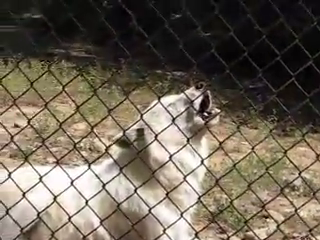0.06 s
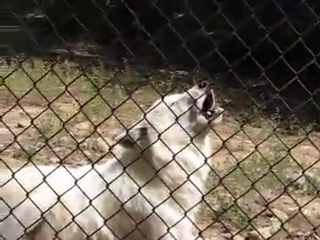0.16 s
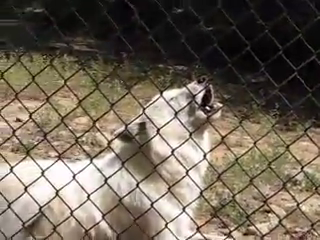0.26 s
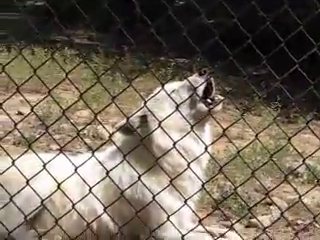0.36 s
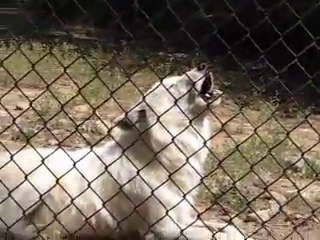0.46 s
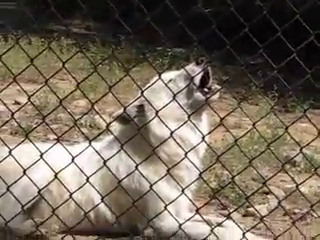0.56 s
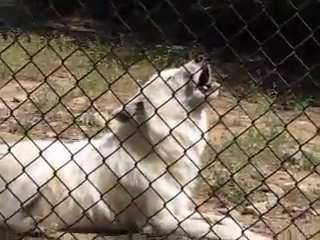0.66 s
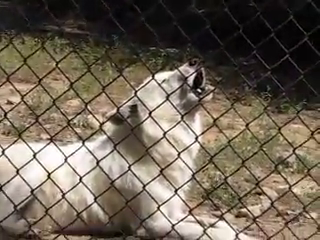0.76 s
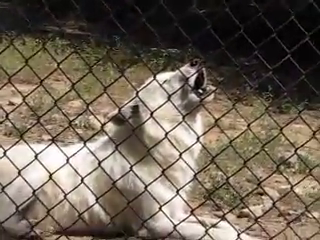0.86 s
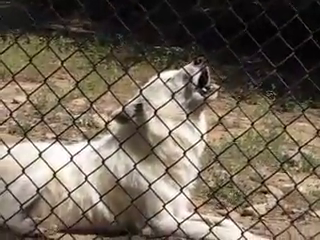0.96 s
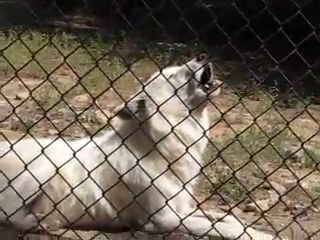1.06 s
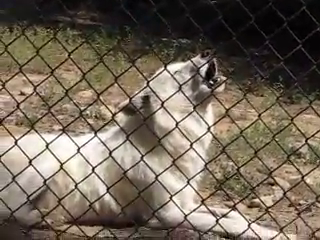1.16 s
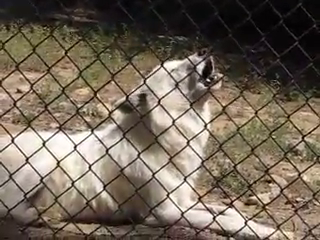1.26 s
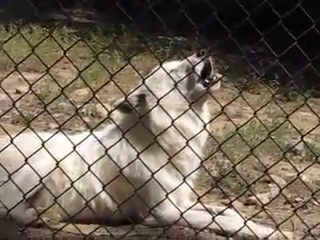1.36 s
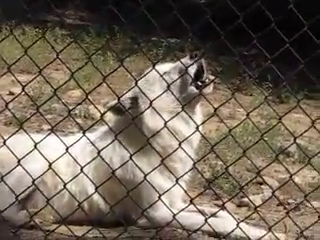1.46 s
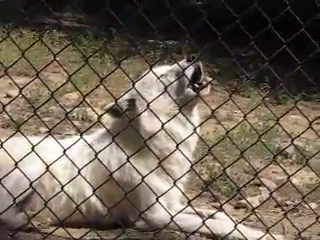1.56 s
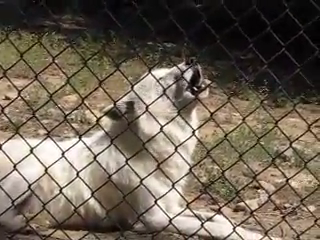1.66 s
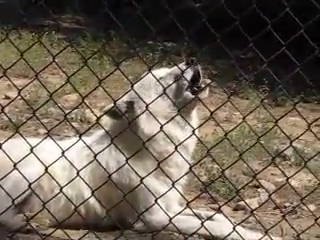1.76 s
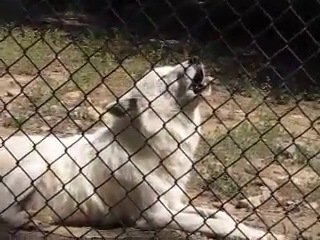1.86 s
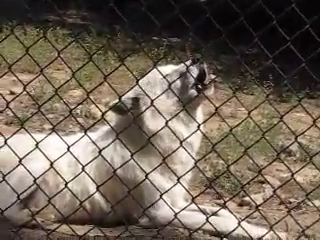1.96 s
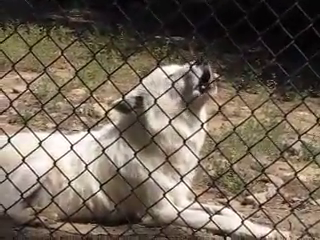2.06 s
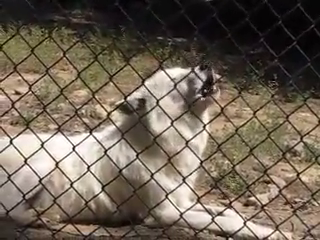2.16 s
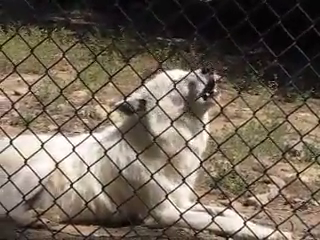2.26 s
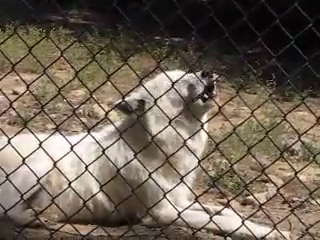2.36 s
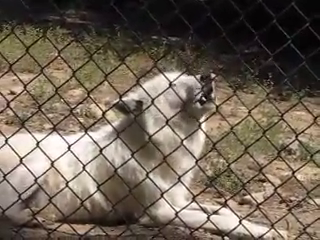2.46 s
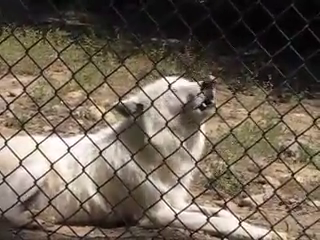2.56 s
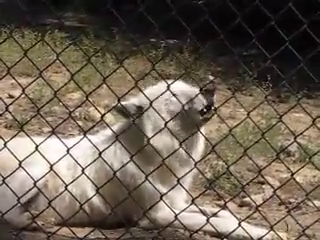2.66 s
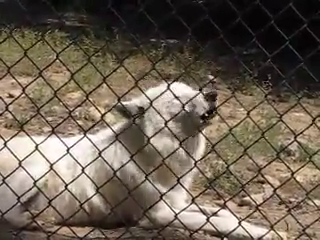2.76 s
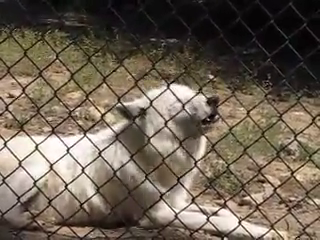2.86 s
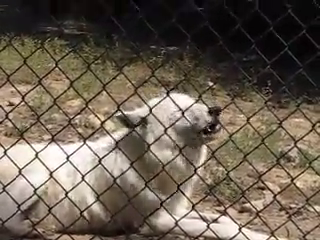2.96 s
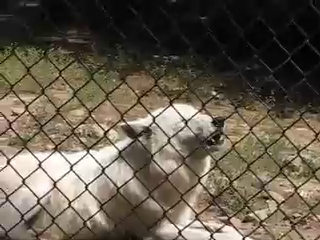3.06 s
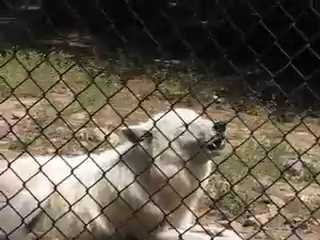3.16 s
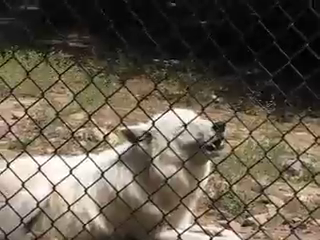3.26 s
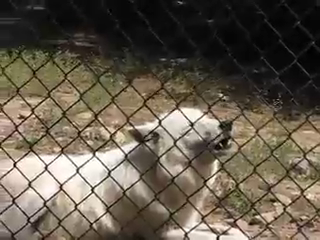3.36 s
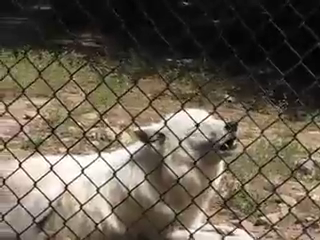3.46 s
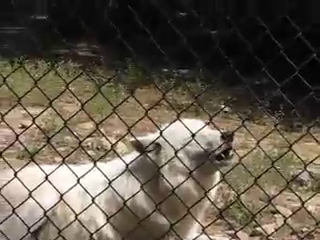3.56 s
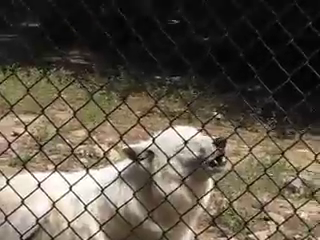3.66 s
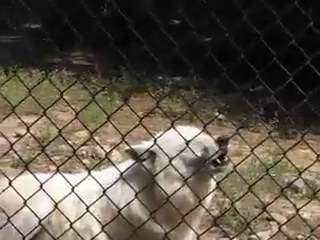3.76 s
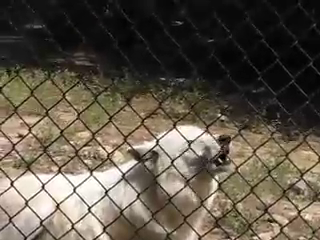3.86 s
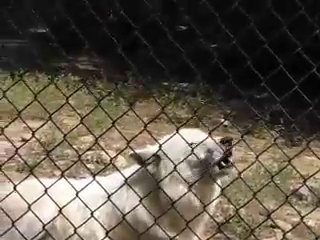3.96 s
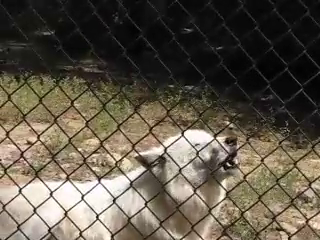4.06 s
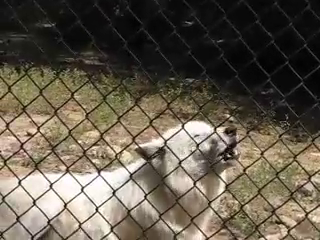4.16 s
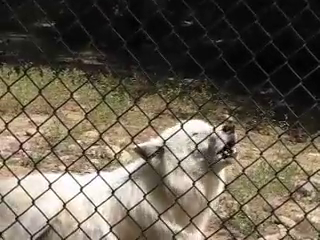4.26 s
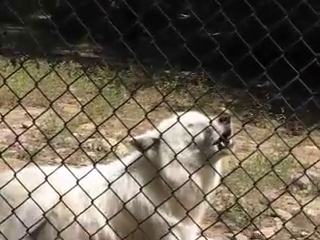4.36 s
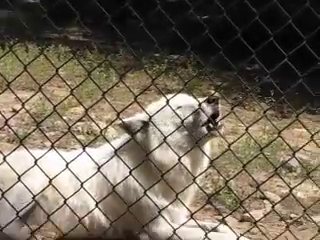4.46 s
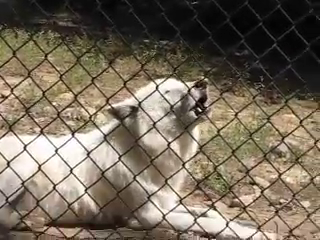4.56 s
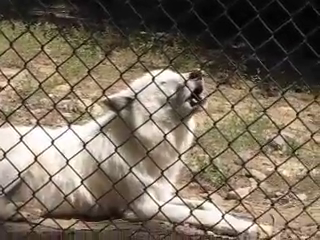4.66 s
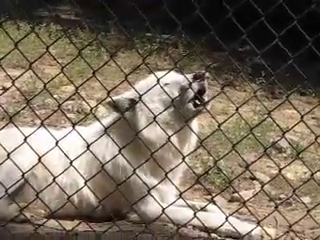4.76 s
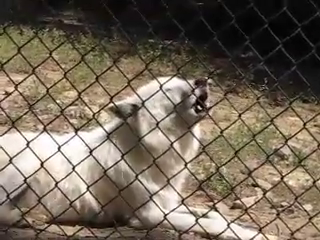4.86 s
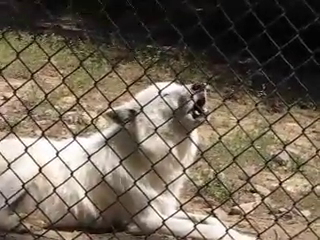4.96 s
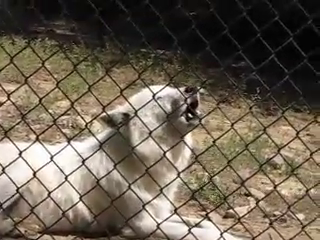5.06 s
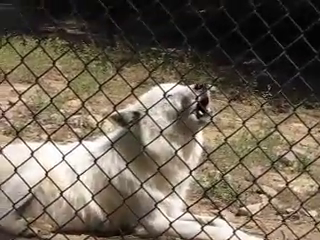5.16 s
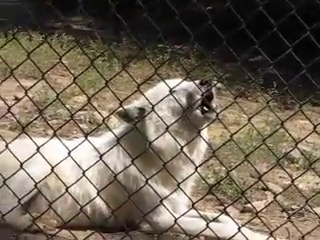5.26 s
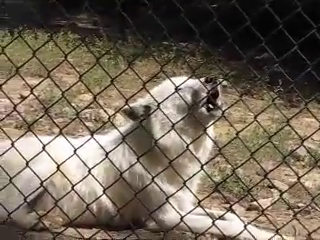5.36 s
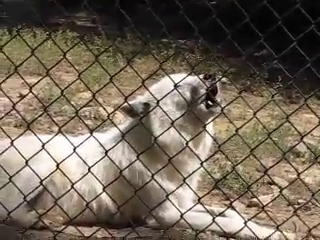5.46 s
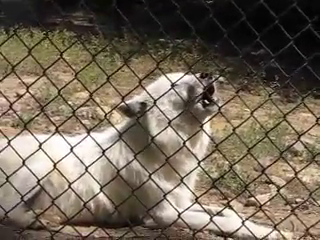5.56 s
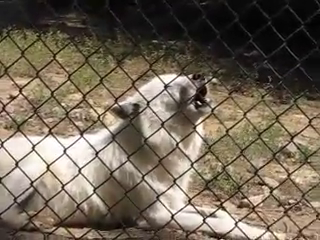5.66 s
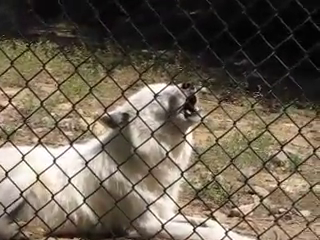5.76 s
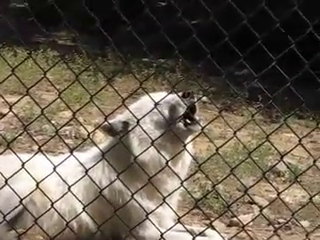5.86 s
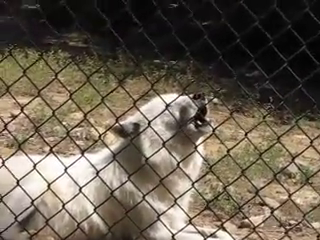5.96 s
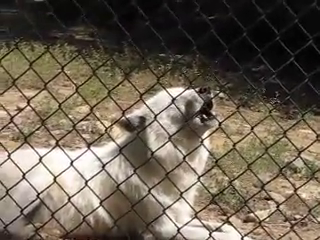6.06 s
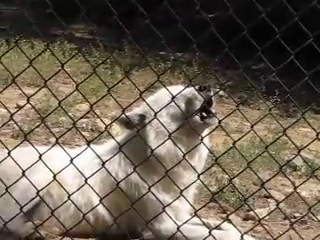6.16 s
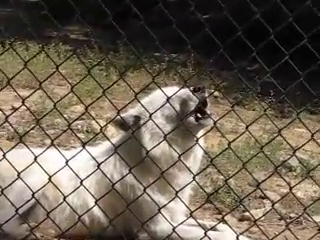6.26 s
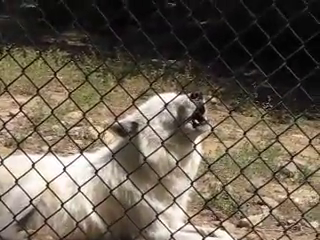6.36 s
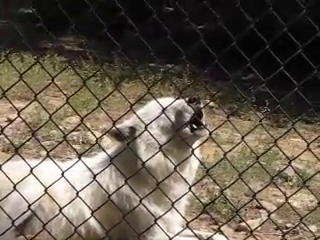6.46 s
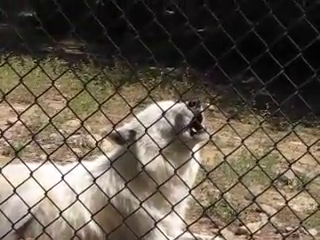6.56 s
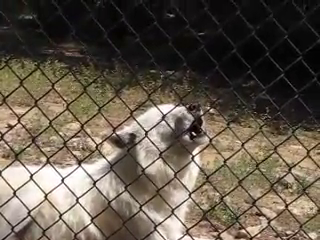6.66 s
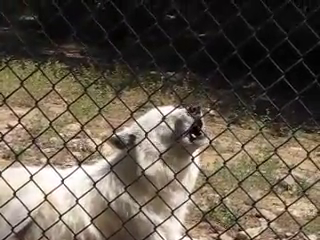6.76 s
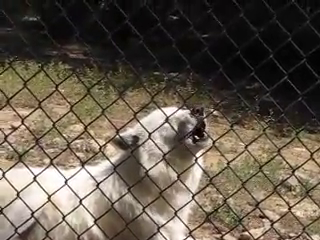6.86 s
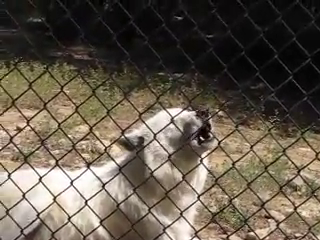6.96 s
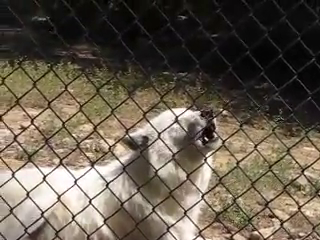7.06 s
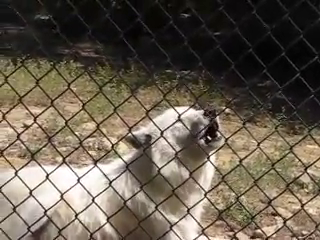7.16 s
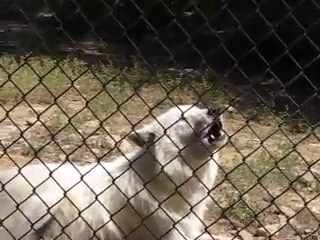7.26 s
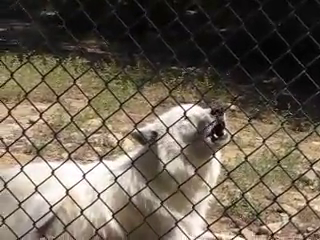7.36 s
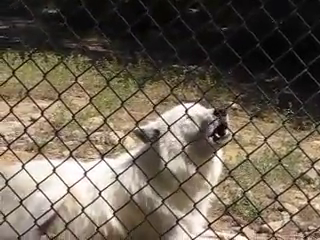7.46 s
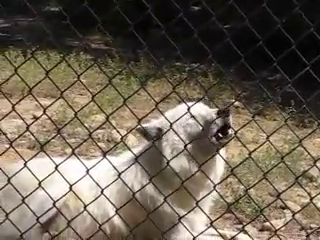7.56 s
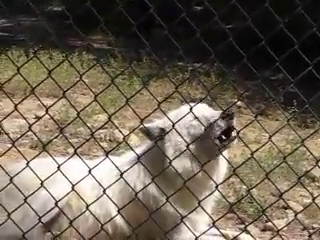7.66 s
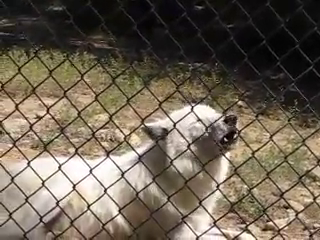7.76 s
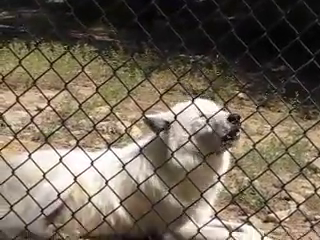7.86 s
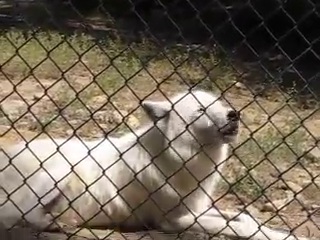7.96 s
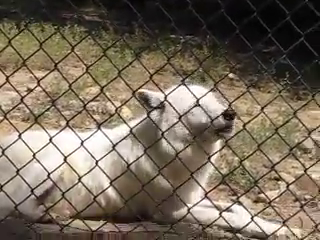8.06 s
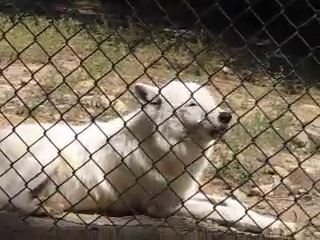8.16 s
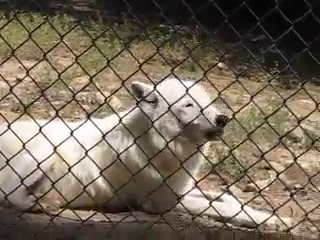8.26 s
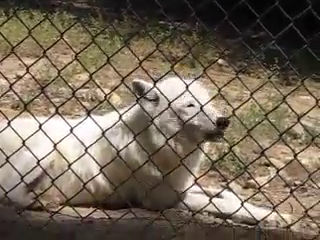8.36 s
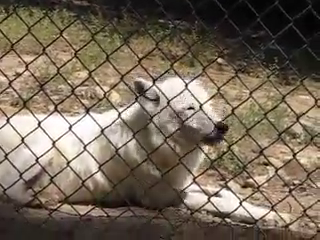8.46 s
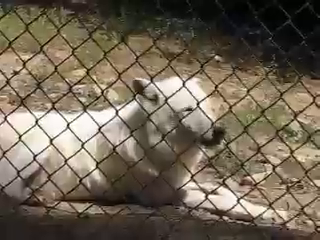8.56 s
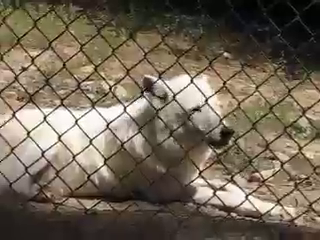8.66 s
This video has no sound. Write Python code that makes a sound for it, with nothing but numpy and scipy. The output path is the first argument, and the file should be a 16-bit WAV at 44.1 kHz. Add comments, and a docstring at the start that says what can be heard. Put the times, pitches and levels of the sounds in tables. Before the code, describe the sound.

Two long howls from a nearby wolf, with other wolves droning and answering from farther off, ending in a low rising moan.

```python
"""In a fenced enclosure among trees, a wolf lying close by howls twice, breaking downward, then starting hoarse.
Its voice is a few strong tones, thin overtones shaped by the throat, pulsing breath noise and a growl.
Pack mates hold long notes that beat together; others answer from farther off, as simpler sums of tones.
Shaped noise makes ticks in dry litter, soft hisses (breath puffs and rustles), dull thuds and the quiet air.
A faint echo comes back from the trees."""
import sys
import numpy as np
from scipy import signal
from scipy.fft import rfft, irfft, next_fast_len
from scipy.io import wavfile
from scipy.ndimage import uniform_filter1d, map_coordinates

SR = 44100
rng = np.random.default_rng(int(sys.argv[2]) if len(sys.argv) > 2 else 0)


def transcribe(signal):
    """Save signal, clipped to [-1, 1], as a 16-bit WAV file at the path in sys.argv[1]."""
    frames = np.atleast_2d(signal).T
    limited = np.clip(frames, -1, 1)
    pcm = np.round(limited * 32767).astype(np.int16)
    wavfile.write(sys.argv[1], SR, pcm)


N = 384880
TIME = np.arange(N) / SR


def amp(db):
    """Turn decibels into a plain multiplier."""
    return 10 ** (np.asarray(db) / 20)


def unit(x):
    """Scale a sound to an average strength (rms) of 1."""
    return x / np.sqrt(np.mean(x ** 2) + 1e-20)


def along(points, hz):
    """Read (pitch_hz, value) points on a log pitch axis, as hearing spaces pitch."""
    point_hz, values = np.transpose(points)
    return np.interp(np.log(hz + 1), np.log(point_hz + 1), values)


def curves(rows):
    """One value per sample for each column after the time."""
    start_s, *columns = np.transpose(rows)
    return [np.interp(TIME, start_s, column) for column in columns]


def gate(start_s, end_s, fade_s=0.083):
    """Open from start to end, with soft edges outside them."""
    nearest_edge = np.minimum(TIME - start_s, end_s - TIME)
    return np.clip(nearest_edge / fade_s + 1, 0, 1) ** 2


def swell(start_s, length_s):
    """One rounded rise and fall."""
    return np.sin(np.pi * np.clip((TIME - start_s) / length_s, 0, 1))


def wobble(rate):
    """A smooth random curve, rate knots a second."""
    knots = rng.standard_normal(int(N * rate / SR) + 4)
    return map_coordinates(knots, [TIME * rate])


def drift_db(live, depth_db, rate):
    """A random swing of level over the live samples, rate knots a second joined by straight lines."""
    knots = rng.standard_normal(int(TIME[-1] * rate) + 2)
    return depth_db * np.interp(TIME[live] * rate, np.arange(len(knots)), knots)


def bell(hz, centre_hz, width_hz):
    """The shape of one resonance, 1 at its centre."""
    return np.exp(-((hz - centre_hz) / width_hz) ** 2)


def filtered(x, gain):
    """Make each frequency in x louder or softer by gain(hz)."""
    size = next_fast_len(N + SR // 2)
    spectrum = rfft(x, size) * gain(np.fft.rfftfreq(size, 1 / SR))
    return irfft(spectrum, size)[..., :N]


def noise(colour):
    """Coloured noise of rms 1."""
    return unit(filtered(rng.standard_normal(N), lambda hz: amp(along(colour, hz))))


def partial(phase):
    """One pure tone, a sine of rms 1."""
    return np.sqrt(2) * np.sin(phase)


STEER_S = .04  # time in which a stray voice settles back on its note


def fold_phase(pitch, drift, jitter):
    """Vocal folds wander slowly and tremble quickly about the note, and keep settling back on it."""
    push = pitch * (drift * wobble(22) + jitter * wobble(260))
    stray = signal.lfilter([1], [1, -np.exp(-1 / (STEER_S * SR))], push)
    return 2 * np.pi * (np.cumsum(pitch) + stray) / SR


# pitch of the near wolf's two howls: start_s, pitch_hz
FIRST_PITCH = [(.01, 592.1), (.23, 579.7), (.4, 560.5), (.58, 549.7), (.94, 517.7), (1.16, 499.3),
               (1.23, 468), (1.263, 449), (1.273, 409), (1.3, 404.3), (1.7, 395.5), (2.1, 386.8),
               (2.135, 365.8), (2.16, 342.1), (2.21, 304.9), (2.29, 295.5), (2.38, 282.3)]
SECOND_PITCH = [(3.75, 274.3), (3.82, 282), (3.87, 303), (3.925, 322.7), (3.96, 380.6), (4.08, 398),
                (4.19, 407), (4.39, 413.1), (4.91, 414.1), (5.29, 420.9), (6.5, 401.2), (6.76, 392.9),
                (6.9, 384.9), (7.05, 377.4), (7.33, 371.8), (7.36, 362), (7.42, 308.6), (7.7, 273.7),
                (7.75, 266.7), (7.87, 224), (7.95, 206)]
# level of their lowest tone, before rasp and fades: start_s, level_db
FIRST_LEVEL = [(0, -12.5), (.6, -19), (.82, -28), (1, -24), (1.14, -30), (1.21, -19.5), (1.449, -19),
               (1.8, -16.5), (2.14, -20.5), (2.3, -32), (2.38, -35)]
SECOND_LEVEL = [(3.75, -40.5), (3.86, -22), (3.95, -15.5), (3.985, -17), (4.081, -10.5), (4.15, -16.5),
                (4.22, -11.5), (4.95, -13), (5.1, -15), (5.22, -12.5), (5.602, -15), (5.85, -12),
                (6.221, -16.5), (6.52, -16.5), (6.78, -12.5), (6.999, -20), (7.39, -19), (7.74, -42.5),
                (7.86, -30)]


def near_wolf():
    """Two howls from one throat, differing in brightness, breath and steadiness of the folds."""
    first = near_howl(FIRST_PITCH, FIRST_LEVEL, strong_db=-5.5, overtone_db=-50.5, breath_db=-48.5,
                      jitter=0.0024, low_register_db=-5.5, mouth_db=19, jaw_loss_db=9,
                      overtone_slack_db=1.5, crack_db=-7.5, bloom_db=2.5, strong_bloom_db=1)
    second = near_howl(SECOND_PITCH, SECOND_LEVEL, strong_db=-0.5, overtone_db=-50.0, breath_db=-51.5,
                       jitter=0.0012, low_register_db=-0.5, mouth_db=18.0, jaw_loss_db=16.5)
    return first + second


BREAK_HZ, BREAK_WIDTH_HZ = 425, 14  # the voice changes register here
FULL_DB = -13.5  # the lowest tone in full voice
RELEASE_S = 0.097  # a howl dies away over this time
BLOOM_S = .35  # the overtones of a fresh howl settle over this time
# colour of the air rushing through the open mouth: pitch_hz, relative level_db (per Hz)
BREATH = [(300, -1), (1240, 7.5), (1820, -5), (2680, 4), (3320, -13), (5000, -2.5), (5750, -17.5),
          (6620, 3), (8250, -19.5), (15000, -26.5)]


def near_howl(pitches, levels, strong_db, overtone_db, breath_db, jitter, low_register_db, mouth_db,
              jaw_loss_db, follow=0.35, bright_follow=0.41, crack_db=-9, bloom_db=-13, strong_bloom_db=-6,
              twelfth_slack_db=-58, overtone_slack_db=-6, patchy_db=16, taut_hz=400, slack_db=-25):
    """Pitch and level drive three strong tones, a ladder of thin overtones, and air pulsing with the folds."""
    (pitch,), (level_db,) = curves(pitches), curves(levels)
    start_s, end_s = pitches[0][0], pitches[-1][0]
    sounding = gate(start_s, end_s) * np.clip((end_s - TIME) / RELEASE_S, 0, 1)
    young = np.clip(1 - (TIME - start_s - GROWL_LENGTH_S) / BLOOM_S, 0, 1)
    crack, slack, rough = strain(pitch)
    high = np.clip((pitch - BREAK_HZ) / BREAK_WIDTH_HZ + .5, 0, 1)
    # everything above the lowest tone takes a share of its swells
    effort_db = level_db - FULL_DB
    bright_db = bright_follow * effort_db + low_register_db * (1 - high)
    phase = fold_phase(pitch, drift=0.0014, jitter=jitter * (1 + 10 * rough))
    # hoarse folds alternate strong and weak cycles and flutter irregularly
    rasp = rough * (0.42 * np.sin(phase / 2) + 1.1 * wobble(240))
    flutter = 1 + .012 * wobble(170)
    voice = amp(level_db) * partial(phase) * (1 + .3 * rasp)

    octave = amp(strong_bloom_db * young) * strong_partial(2, pitch, phase, high)
    twelfth = amp(twelfth_slack_db * slack) * strong_partial(3, pitch, phase, high)
    upper = (octave + twelfth) * amp(strong_db + follow * effort_db)

    # slack, cracking or freshly started folds change the highest overtones most
    dull_db = slack_db * np.clip(1 - pitch / taut_hz, -.08, 1) + bloom_db * young
    treble_db = dull_db + crack_db * crack
    # the middle resonance weakens as the breath runs out
    jaw_db = JAW_DB - jaw_loss_db * ((TIME - start_s) / (end_s - start_s)) ** 2
    ladder = throat_ladder(sounding > 0, pitch, phase, slack, treble_db, mouth_db, jaw_db, patchy_db)
    growl_swell = swell(GROWL_START_S, GROWL_LENGTH_S)
    ladder_db = bright_db + overtone_db + overtone_slack_db * slack * (2 - growl_swell)
    upper = upper + amp(ladder_db) * ladder

    breath_level = amp(bright_db + breath_db + np.minimum(dull_db, 0))
    breath = breath_level * noise(BREATH) * (1 + .5 * np.cos(phase))
    return sounding * ((voice + upper * (1 + rasp)) * flutter + breath + growl(phase))


# peaks that the 2nd and 3rd tones glide through, below and above the break: pitch_hz, relative level_db
LOW_REGISTER = [(450, -43.5), (560, -25.5), (615, -37.5), (680, -26.5), (735, -15.5), (762, -15),
                (785, -25), (802, -34.5), (827, -27.5), (880, -34), (1095, -48), (1150, -26.5), (1180, -16),
                (1260, -17)]
HIGH_REGISTER = [(900, -28.5), (1000, -23), (1120, -5.5), (1190, -9.5), (1450, -30), (1700, -44.5)]


def strong_partial(k, pitch, phase, high):
    """The kth tone swells and fades as the pitch carries it through the peaks of its register."""
    hz = k * pitch
    register_db = high * along(HIGH_REGISTER, hz) + (1 - high) * along(LOW_REGISTER, hz)
    # the throat spreads the phases of the tones, so the wave stays round
    return amp(register_db) * partial(k * phase + k * k)


MOUTH_HZ, MOUTH_WIDTH_HZ = 1205, 92  # the open mouth lifts whichever overtone glides through here
SHUT_START_S, SHUT_LENGTH_S, SHUT_SHARE = 7.47, 0.17, 0.85  # closing mouth; share of its resonance lost
JAW_DB, JAW_WIDTH_HZ = 13, 315  # starting height and width of the middle resonance
NASAL_DB, NASAL_WIDTH_HZ = -13.5, 230  # depth and width of the nasal notch
SWAY_DB_PER_KHZ = .75
# fixed overtone colour of the throat: pitch_hz, relative level_db
THROAT = [(1000, -2), (1400, 11.5), (1660, 3), (2060, -4.5), (2470, -5), (2800, -4.5), (3300, -20.5),
          (3720, -14), (4160, -20), (4550, -16.5), (5000, -13), (5500, -26), (6200, -11.5), (6600, -4),
          (7250, -22.5), (8300, -31.5), (12000, -33.5)]
# two high throat resonances, open early in the first howl and late in the second:
# start_s, lower_centre_hz, lower_level_db, upper_level_db
RING = [(0, 4590, 9.5, 5.5), (.6, 5050, 8.5, 4.5), (1.7, 4900, 0.5, -1.5), (5.55, 4930, -4.5, 0),
        (5.8, 4970, 11, 0.5), (6.4, 4900, 10, 9), (6.95, 4660, 7, -14)]
# the middle resonance wanders as the tongue and jaw move: start_s, centre_hz
JAW = [(0, 2110), (.7, 2580), (1.4, 2375), (2.14, 2650), (4, 2360), (4.6, 2240), (5.3, 2580), (6.2, 2090),
       (6.7, 1910), (7.1, 2540)]
# the nasal passage swallows a band, moving as the muzzle sinks: start_s, centre_hz
NASAL = [(1.7, 3140), (2.1, 2240), (3.93, 1900), (4.1, 3350), (6.35, 3300), (6.8, 2700), (6.97, 2270),
         (7.1, 1780)]


def throat_ladder(live, pitch, phase, slack, treble_db, mouth_db, jaw_db, patchy_db):
    """Thin overtones, each made louder or softer by the resonances of throat, mouth and nose."""
    table_curves = curves(RING) + curves(JAW) + curves(NASAL)
    ring_hz, ring_db, upper_ring_db, jaw_hz, nasal_hz = [curve[live] for curve in table_curves]
    mouth_open = 1 - SHUT_SHARE * np.clip((TIME[live] - SHUT_START_S) / SHUT_LENGTH_S, 0, 1)
    ladder = np.zeros(N)
    for k in range(4, 30):
        hz = k * pitch[live]
        throat_db = along(THROAT, hz) + treble_db[live] * np.clip(hz / 3000 - .6, 0, 1)
        throat_db += mouth_db * mouth_open * bell(hz, MOUTH_HZ, MOUTH_WIDTH_HZ)
        throat_db += jaw_db[live] * bell(hz, jaw_hz, JAW_WIDTH_HZ)
        throat_db += ring_db * bell(hz, ring_hz, 320) + upper_ring_db * bell(hz, 6500, 700)
        throat_db += NASAL_DB * bell(hz, nasal_hz, NASAL_WIDTH_HZ)
        # overtones vary as the head sways (up to 5 kHz, more with pitch), and break up when folds go slack
        sway_db = drift_db(live, depth_db=SWAY_DB_PER_KHZ * np.minimum(hz / 1000, 5), rate=4.5)
        patches_db = slack[live] * drift_db(live, depth_db=patchy_db, rate=25)
        ladder[live] += amp(throat_db + sway_db + patches_db) * partial(k * phase[live] + k * k)
    return ladder


GROWL_START_S, GROWL_LENGTH_S = 3.75, 0.14  # the hoarse start of the second howl
GROWL_DB = -29.5  # level before its swell
GROWL_AIR = 0.0097  # rushing air against the slaps
GROWL_ATTACK_S = .0015
# what each slap of the folds rings: pitch_hz, relative level_db, t60_s (time to fade by 60 dB)
GROWL_MODES = [(191, -17, .03), (556, -1.5, .024), (729, -2.5, 0.024), (1270, -15, 0.02),
               (2560, -26.5, .01)]


def growl(phase):
    """Loose folds slap shut on every second or third cycle, at random, and ring the throat."""
    cycles = np.flatnonzero(np.diff(phase // (2 * np.pi)) > 0)
    slaps = cycles[np.cumsum(rng.integers(2, 4, len(cycles) // 3)) - 1]
    drive = GROWL_AIR * rng.standard_normal(N)
    drive[slaps] += amp(2 * rng.standard_normal(len(slaps)))
    t = np.arange(SR // 20) / SR
    ring = sum(amp(db - 60 * t / t60) * np.sin(2 * np.pi * hz * t) for hz, db, t60 in GROWL_MODES)
    soft_ring = ring * (1 - np.exp(-t / GROWL_ATTACK_S)) ** 2
    envelope = swell(GROWL_START_S, GROWL_LENGTH_S) ** .33
    return amp(GROWL_DB) * envelope * unit(signal.fftconvolve(drive, soft_ring)[:N])


TAUT_HZ = 370  # below this pitch the folds are slack
GLIDE_HZ_PER_S = 680  # a glide this fast makes the voice crack fully
CRACK_ROUGH, SLACK_ROUGH, GROWL_ROUGH = .17, .4, .4  # roughness from each cause


def strain(pitch):
    """Fast glides crack the voice and low notes slacken the folds; these and the growl roughen it (0-1)."""
    glide = uniform_filter1d(np.abs(np.gradient(pitch)) * SR, size=900)
    crack = np.clip(glide / GLIDE_HZ_PER_S, 0, 1) ** 2
    slack = np.clip(1 - pitch / TAUT_HZ, 0, 1)
    growl_rough = GROWL_ROUGH * np.sqrt(swell(GROWL_START_S, GROWL_LENGTH_S))
    rough = np.clip(CRACK_ROUGH * crack + SLACK_ROUGH * slack + growl_rough, 0, 1)
    return crack, slack, rough


def mate(pitch, db, colour, jitter, even_db=-28, follow=1, count=10):
    """A howl under a fixed throat colour; overtones take a share (follow) of each swell away from even_db."""
    phase = fold_phase(pitch, drift=.002, jitter=jitter)

    def harmonic(k):
        """The kth tone, as loud as the throat lets it through."""
        return amp(along(colour, k * pitch)) * partial(k * phase)

    overtones = sum(harmonic(k) * amp(2.1 * wobble(7.5)) for k in range(2, count + 1))
    overtone_db = even_db + follow * (db - even_db)
    return amp(db) * harmonic(1) + amp(overtone_db) * overtones


# pitch of a nearby mate: start_s, pitch_hz
STEADY_PITCH = [(0, 354), (.5, 352.9), (.85, 360.2), (1.3, 360.8), (1.5, 354.1), (2.2, 351.6), (2.6, 348.6),
                (3, 344.3), (3.65, 272.1)]
# its throat colour: pitch_hz, relative level_db
STEADY_COLOUR = [(345, 5), (705, -0.8), (1055, -16.5), (4000, -51)]


def steady_mate(level_db=-39.0, release_s=0.39, release_db_per_s=110):
    """One long note, already under way, that sags and fades at its end."""
    end_s = STEADY_PITCH[-1][0]
    db = level_db - release_db_per_s * np.maximum(TIME - end_s + release_s, 0)
    return gate(0, end_s) * mate(*curves(STEADY_PITCH), db, STEADY_COLOUR, jitter=.004)


# pitch of a second mate, for a while only a few Hz away, so that the two throb: start_s, pitch_hz
JOINING_PITCH = [(.5, 222.1), (.7, 261.2), (.88, 335.4), (1.02, 362.6), (1.4, 365), (1.8, 365.3),
                 (2.2, 363.9), (2.55, 357.7), (2.9, 353.8), (3.15, 343.4), (3.6, 338.2), (3.78, 297)]
# it joins in softly and then sings out, before its throat colour: start_s, level_db
JOINING_LEVEL = [(.5, -56), (1, -25.5), (1.25, -34), (1.8, -23.5), (2.2, -23.5), (2.6, -34.5),
                 (2.86, -30.5), (2.93, -20.3), (3.57, -18), (3.65, -35), (3.78, -29.5)]
# its throat colour: pitch_hz, relative level_db
JOINING_COLOUR = [(352, 1.5), (690, -23), (1040, -30.5), (1410, -42), (1760, -23.5), (2120, -59)]


def joining_mate():
    """Slides up to nearly the same note, beats against it, and drops off."""
    voice = mate(*curves(JOINING_PITCH), *curves(JOINING_LEVEL), JOINING_COLOUR, jitter=0.0025, follow=0.085)
    return gate(JOINING_PITCH[0][0], JOINING_PITCH[-1][0]) * voice


# a low moan near the end, before its throat colour: start_s, pitch_hz, level_db of the lowest tone
MOAN = [(7.95, 166.2, -56.5), (8.063, 209, -52), (8.16, 245.7, -56.5), (8.428, 225.4, -49),
        (8.494, 232.2, -54.5), (8.624, 285.7, -35.5), (8.727, 315, -41.5)]
# its throat colour: pitch_hz, relative level_db
MOAN_COLOUR = [(245, 4), (465, -9), (600, 0), (715, 3.5), (915, -22), (1210, -45), (2520, -62)]


def moaning_mate():
    """A low, unsteady voice whose folds tremble more than the other mates'."""
    voice = mate(*curves(MOAN), MOAN_COLOUR, jitter=0.009)
    return gate(MOAN[0][0], MOAN[-1][0], fade_s=0.059) * voice


# short falling whimpers: start_s, length_s, start_hz, end_hz, peak level_db
WHIMPERS = [(1.371, 0.089, 312, 221, -33), (1.663, 0.077, 283, 206, -39), (1.84, 0.064, 250, 216, -42.5),
            (2.001, 0.07, 250, 199, -43), (2.768, 0.15, 424, 375.5, -41.5), (5.858, 0.19, 655, 440, -48.5)]


def whimpers():
    """Short pure notes that fall in pitch."""
    out = np.zeros(N)
    for start_s, length_s, start_hz, end_hz, db in WHIMPERS:
        pitch = np.interp(TIME, [start_s, start_s + length_s], [start_hz, end_hz])
        phase = 2 * np.pi * np.cumsum(pitch) / SR
        out += amp(db) * swell(start_s, length_s) * partial(phase)
    return out


# howls from farther off: start_s, length_s, start_hz, end_hz, level_db (about which it wavers)
FAR = [(-.2, 1.63, 415, 386, -46.5), (8.332, 0.38, 900, 953, -54), (0.852, 1.43, 957, 912, -50.5),
       (1.9, 1.06, 540, 554, -52), (3.397, 0.84, 242, 273.6, -45), (4.143, 1.12, 669, 650, -40.5),
       (5.19, 0.78, 670, 656, -33.5)]


def far_howls():
    """Of the distant wolves only the strongest tone carries."""
    out = np.zeros(N)
    for start_s, length_s, start_hz, end_hz, db in FAR:
        pitch = np.interp(TIME, [start_s, start_s + length_s], [start_hz, end_hz])
        tone = partial(fold_phase(pitch, drift=0.0018, jitter=0.003))
        out += amp(db + wobble(7.4)) * np.sqrt(swell(start_s, length_s)) * tone
    return out


# ticks in the dry litter: start_s, level_db before the common tick_db
TICKS = [(2.6456, -36), (3.1257, -34), (3.2353, -35.5), (3.8657, -25), (5.7375, -30.5), (6.0284, -34.5),
         (6.405, -34)]
# soft hisses, breath puffs of the wolf and rustles: start_s, length_s, level_db
HISSES = [(2.264, .1, -48), (3.178, .2, -53.5), (3.85, 0.14, -52.5), (7.292, 0.065, -43.5),
          (7.345, 0.087, -47.5)]
# dull thuds, a chuff of the wolf, the growl's onset and scuffs: start_s, level_db
THUDS = [(3.557, -36.5), (3.579, -32.5), (3.686, -37), (3.754, -32), (4.1, -35)]
# noise colours of ticks with hisses, and of thuds: pitch_hz, relative level_db
TICK_COLOUR = [(500, -8.5), (1500, 3), (2600, -3.5), (4000, -1), (6000, -19), (15000, -37)]
THUD_COLOUR = [(100, -22.5), (520, 0.5), (900, -9), (2000, -32), (6000, -53.5)]


def small_noises(tick_db, tick_t60, thud_t60, grain_db):
    """Noise bursts that start sharply (ticks, dull thuds) or swell with a grainy flicker (soft hisses)."""

    def bursts(rows, t60):
        """Sudden starts that die away by 60 dB in t60 seconds."""
        return sum(amp(db - 60 * np.abs(TIME - s) / t60) * (TIME >= s) for s, db in rows)

    ticks = amp(tick_db) * bursts(TICKS, tick_t60)
    grain = unit(amp(grain_db * wobble(350)))
    hisses = sum(amp(db) * swell(start_s, length_s) for start_s, length_s, db in HISSES) * grain
    return (ticks + hisses) * noise(TICK_COLOUR) + bursts(THUDS, thud_t60) * noise(THUD_COLOUR)


def scatter(x, t60):
    """Fence and ground scatter the treble, which reaches the two ears in opposite phase."""
    t = np.arange(SR // 20) / SR
    taps = rng.standard_normal(len(t)) * amp(-60 * t / t60)
    early = signal.fftconvolve(x, taps / np.linalg.norm(taps))[:N]
    treble = [(430, -32.0), (1230, -16.5), (2300, -5), (6450, -4.0)]  # pitch_hz, level_db
    side = filtered(early, lambda hz: amp(along(treble, hz)))
    return np.array([side, -side])


# how long the echo lasts: pitch_hz, t60_s (time to fade by 60 dB)
TREES = [(300, 1), (2000, 1), (8000, 0.011)]


def echo(x):
    """A diffuse tail of fading noise from the trees, different for each ear."""
    hz, t, cells = signal.stft(rng.standard_normal((2, SR)), SR, nperseg=256)
    fading = cells * amp(-60 * t / along(TREES, hz)[:, None])
    tail = signal.istft(fading, SR, nperseg=256)[1]
    return signal.fftconvolve(x[None], tail / np.linalg.norm(tail[0]), axes=1)[:, :N]


# colour of the air: pitch_hz, relative level_db (per Hz)
AIR = [(25, -3.5), (70, 1), (150, -7.5), (400, -5.5), (1800, -18), (9000, -30.5), (15000, -35.5)]
# its level, about which it wavers: start_s, level_db
AIR_DB = [(0, -55.5), (3.3, -46.5), (4.7, -51), (6.6, -51), (7.7, -49.5), (8.7, -51.5)]
# how alike left and right are: pitch_hz, likeness (1 same, 0 unrelated, below 0 opposed)
ALIKE = [(60, 0.53), (240, 0.76), (950, 0.78), (3770, -0.27)]


def air():
    """Quiet outdoor rumble and hiss: a shared and an opposed noise mixed to set the ears' likeness."""
    turn = lambda hz: np.arccos(np.clip(along(ALIKE, hz), -1, 1)) / 2
    mid = filtered(noise(AIR), lambda hz: np.cos(turn(hz)))
    side = filtered(noise(AIR), lambda hz: np.sin(turn(hz)))
    return amp(curves(AIR_DB)[0] + 1.5 * wobble(4.8)) * np.array([mid + side, mid - side])


# balance of the direct sound: pitch_hz, left_minus_right_db
LEAN = [(60, -3), (150, -2.5), (380, 1.5), (950, 0), (2380, -4), (5980, 4), (15000, -1.5)]


def scene():
    """The near wolf and its pack, heard directly, off the fence and from the trees."""
    near = near_wolf() + small_noises(tick_db=-4.5, tick_t60=0.019, thud_t60=0.17, grain_db=4.0)
    pack = steady_mate() + joining_mate() + moaning_mate() + far_howls() + whimpers()
    both_ears = lambda hz: amp(np.array([along(LEAN, hz), -along(LEAN, hz)]) / 2)
    direct = filtered(near + pack, both_ears)
    # the pack sends more of its sound by way of the trees
    echoes = echo(amp(-28) * near + amp(-16.5) * pack)
    return direct + scatter(near + pack, t60=0.01) + echoes + air()


TOP_HZ = 15700


def record(dry):
    """Nothing at or above TOP_HZ is kept."""
    return filtered(dry, lambda hz: hz < TOP_HZ)


dry = scene()
out = record(dry)
transcribe(out)
```